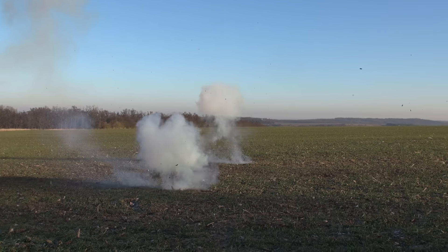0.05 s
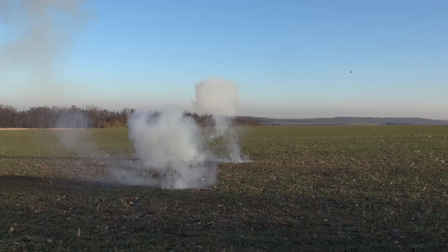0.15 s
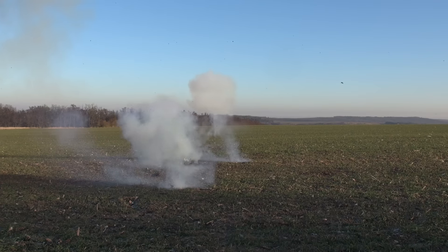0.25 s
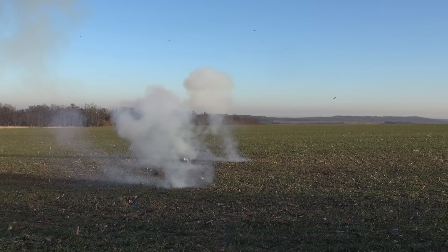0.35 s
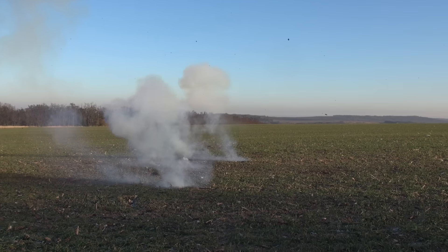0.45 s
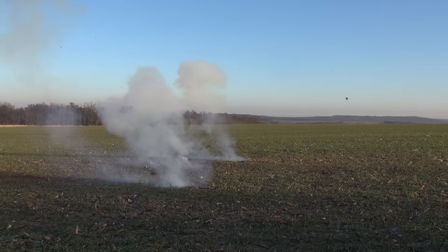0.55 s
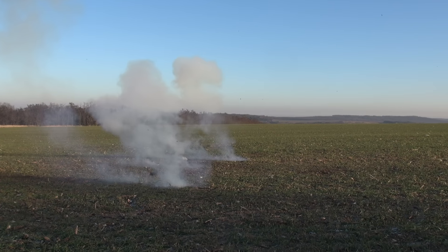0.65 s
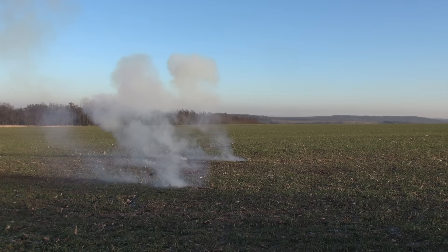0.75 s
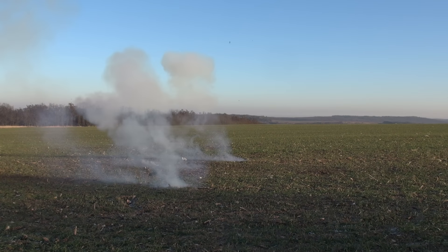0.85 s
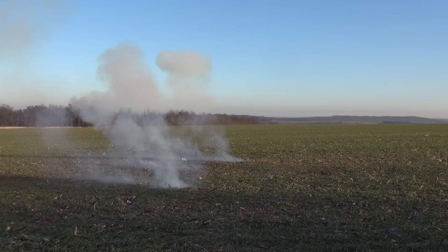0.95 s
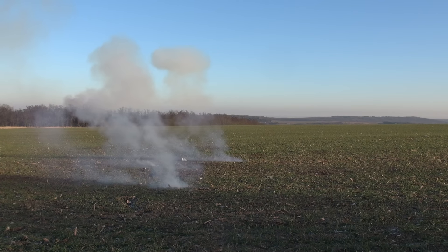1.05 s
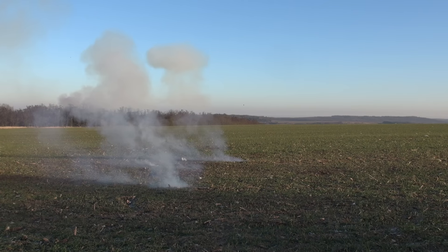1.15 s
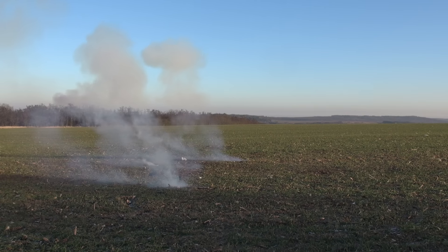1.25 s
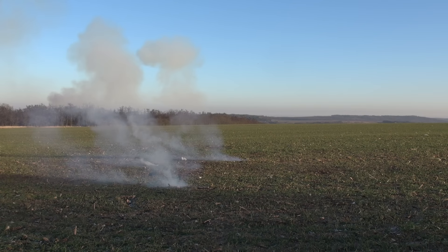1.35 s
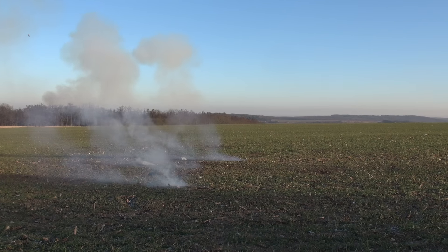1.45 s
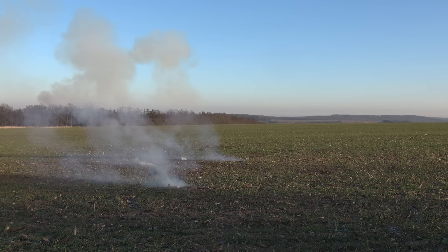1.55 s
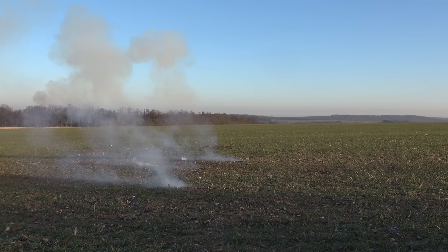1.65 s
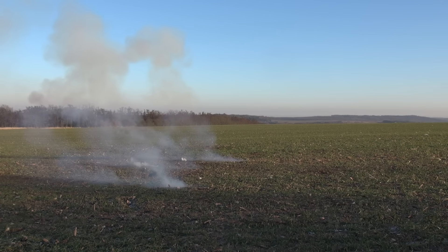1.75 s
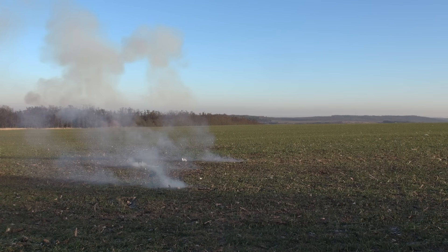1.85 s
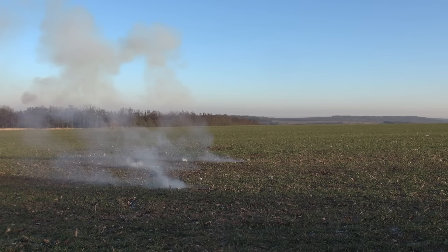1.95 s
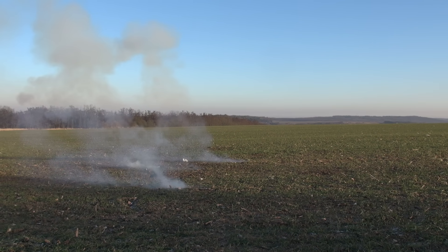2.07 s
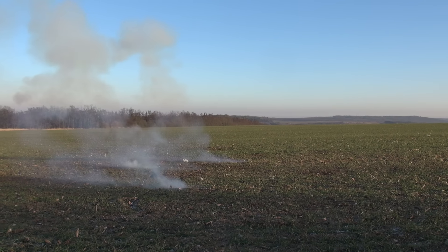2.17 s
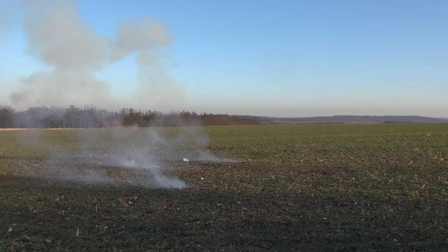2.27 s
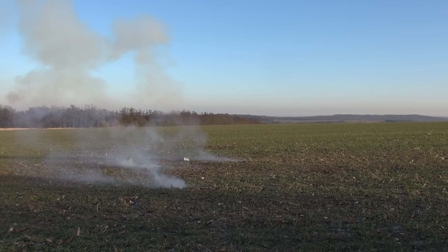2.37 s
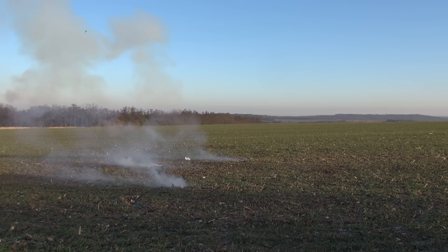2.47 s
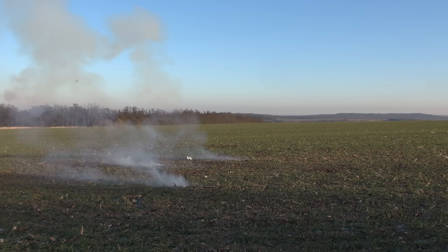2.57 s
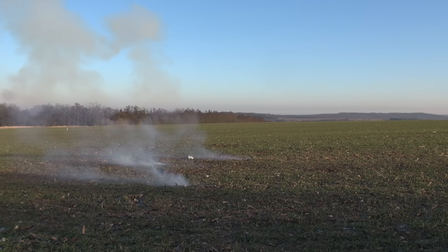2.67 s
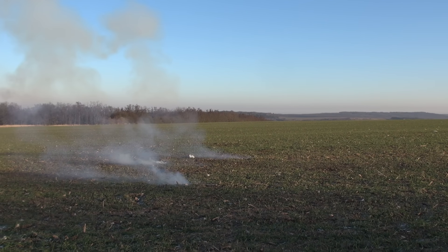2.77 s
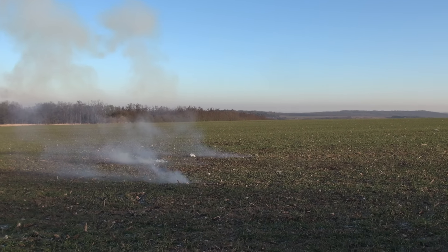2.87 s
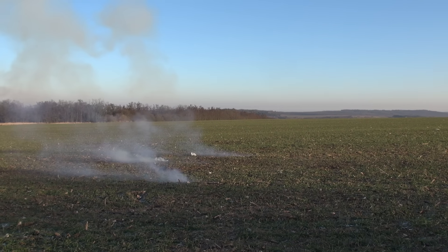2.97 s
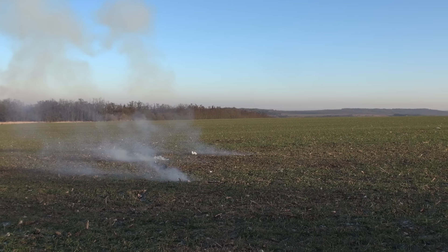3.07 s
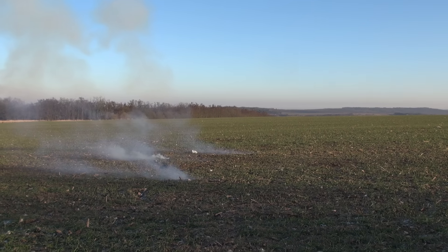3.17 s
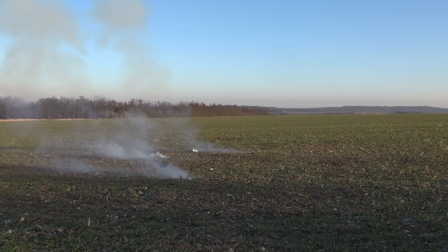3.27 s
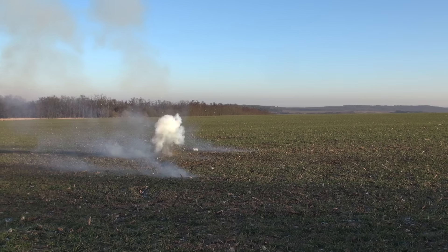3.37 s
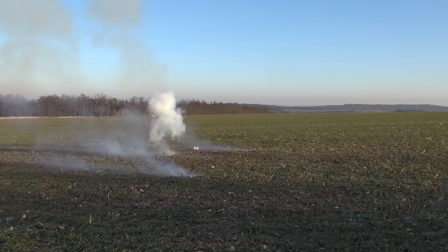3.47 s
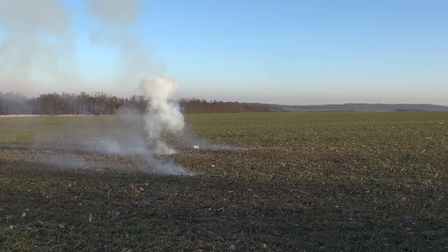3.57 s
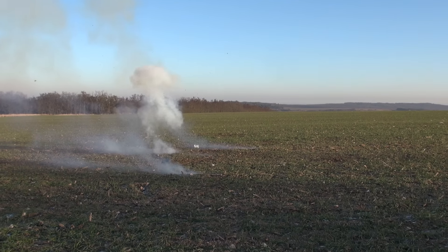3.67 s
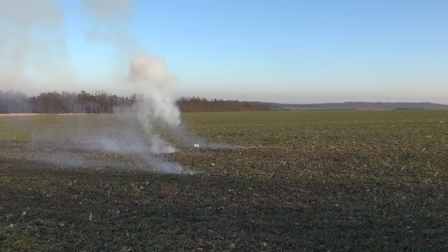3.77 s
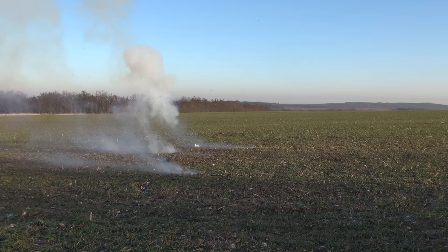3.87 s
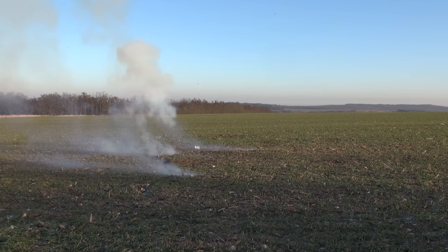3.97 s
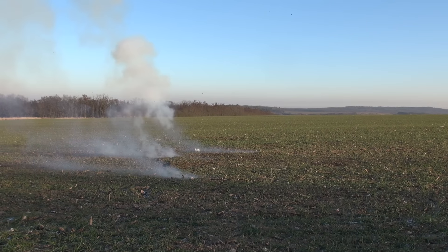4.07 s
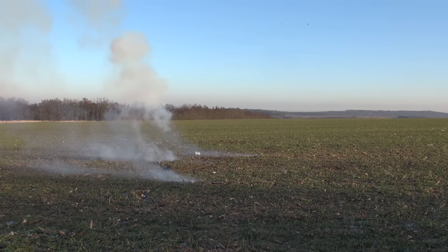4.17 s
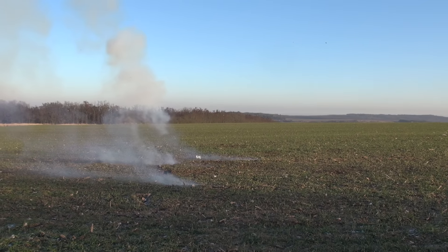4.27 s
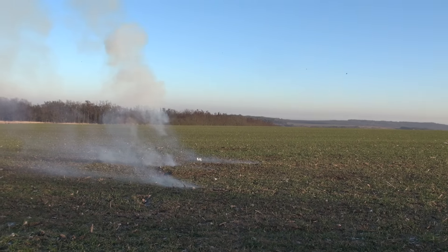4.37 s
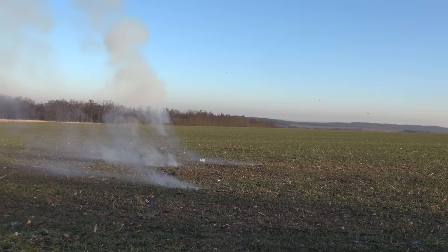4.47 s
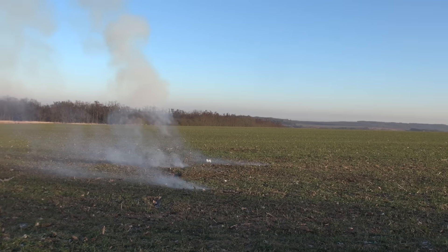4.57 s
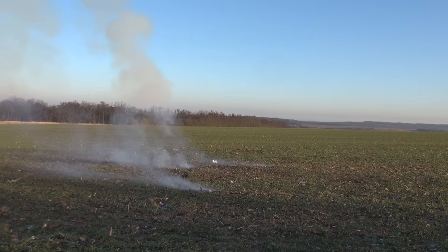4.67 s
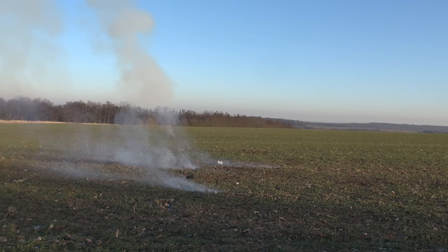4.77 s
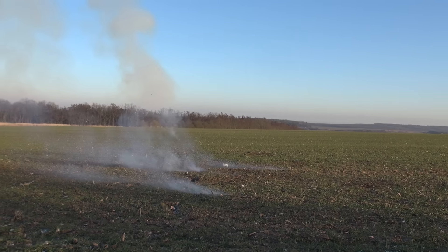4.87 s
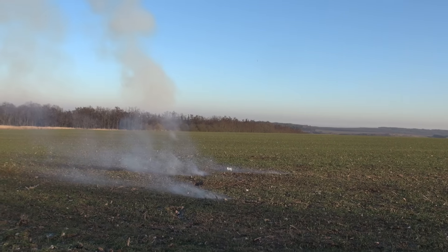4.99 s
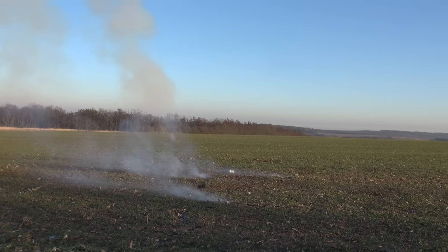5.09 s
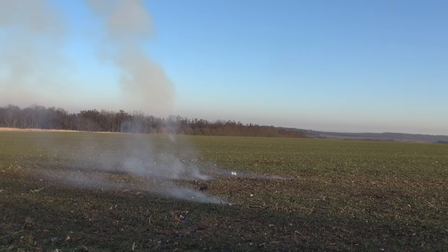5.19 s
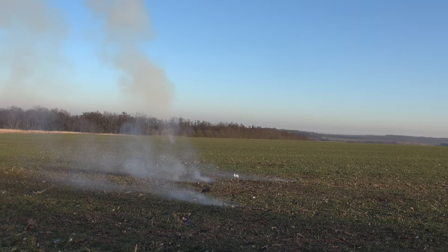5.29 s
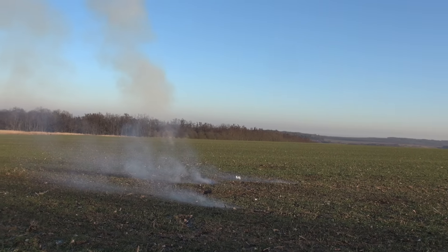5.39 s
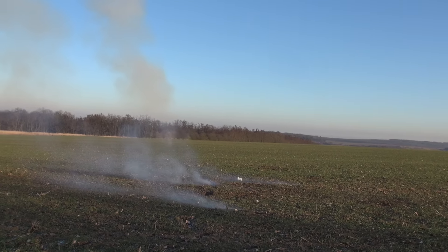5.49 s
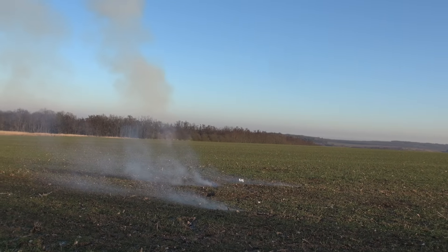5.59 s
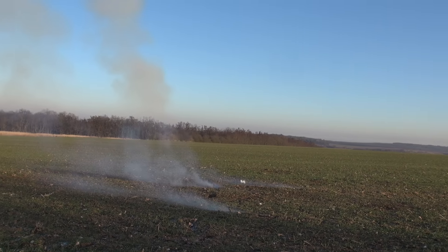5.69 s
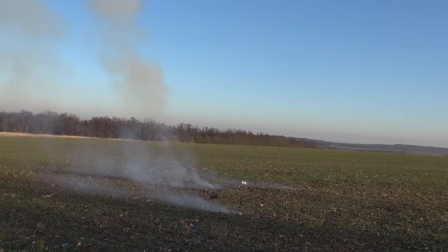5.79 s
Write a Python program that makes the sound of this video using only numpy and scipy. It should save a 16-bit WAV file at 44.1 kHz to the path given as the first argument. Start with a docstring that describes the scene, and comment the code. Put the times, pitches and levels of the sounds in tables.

```python
"""Big firecrackers on a bare field

Two have just exploded; a third bursts close by, its shock fronts overloading the microphone.
Each bang rolls out over the ground, then a forest edge throws it back as a long dying roar.
Clods of earth patter down nearby, something scuffs on the soil, and a thin, bright hiss swells late."""
import sys
import numpy as np
from scipy import signal
from scipy.io import wavfile
from scipy.ndimage import uniform_filter1d

SR = 44100
rng = np.random.default_rng(int(sys.argv[2]) if len(sys.argv) > 2 else 0)


def output_pcm(signal):
    """Save a mono or channel-first signal as 16-bit PCM at the path in sys.argv[1].

    Samples are clipped to [-1, 1] before scaling.
    """
    pcm = np.clip(np.atleast_2d(signal).T, -1, 1) * 32767
    wavfile.write(sys.argv[1], SR, np.round(pcm).astype(np.int16))


N = 257544
TIME = np.arange(N) / SR
EDGES_HZ = np.concatenate([np.geomspace(22, 5000, 20), np.geomspace(5800, 17000, 9)])
CENTRES_HZ = np.sqrt(EDGES_HZ[1:] * EDGES_HZ[:-1])

# the three explosions, the close one last: start_s, ground_roll_db, forest_echo_db, roar_db
BANGS = [(-.52, -32, -23.5, -27), (-.163, -16.5, -23.5, -15.5), (3.403, -13, -19.5, -15.5)]
# tone colour of earth landing: frequency_hz, level_db
CLOD_SPECTRUM = [(150, -8), (600, -9.5), (1200, -9), (1900, 0), (3200, 2), (4500, -8.5), (7500, 2.5),
                 (11000, -8), (14000, -2.5), (16000, -9)]
# stereo width of far sound, near sound and falling earth: frequency_hz, likeness (-1 to 1, 1 is mono)
FAR_LIKENESS = [(60, 0.66), (300, 0.79), (700, 0.66), (1400, 0.74), (3100, 0.56), (7000, -0.06),
                (15000, 0.2)]
NEAR_LIKENESS = [(60, 1), (300, 0.88), (1400, 0.83), (3100, 0.48), (5200, -0.35), (8500, -1), (15000, 0.12)]
CLOD_LIKENESS = [(300, 0.71), (2000, 0.72), (4000, -0.21), (8000, -0.82), (14000, -0.29)]
# panning of far and near sound: frequency_hz, left_over_right_db
FAR_BALANCE = [(60, 4), (110, -2.5), (200, 2), (350, 6), (700, 2.5), (1300, 4.5), (4400, 5.5),
               (15000, -2.5)]
NEAR_BALANCE = [(60, 0.088), (200, 0), (500, 0.93), (2000, 0.64), (15000, 0.26)]


def from_db(db):
    """Decibels to gain."""
    return 10 ** (np.asarray(db) / 20)


def rms_one(x):
    """Scale to unit rms."""
    return x / np.sqrt(np.mean(x ** 2) + 1e-20)


def panned(pan_db):
    """Left and right gains; positive leans left."""
    return from_db([[pan_db / 2], [-pan_db / 2]])


def at_hz(points, hz):
    """A table read on a log-frequency axis."""
    frequencies, values = np.transpose(points)
    return np.interp(np.log(hz), np.log(frequencies), values)


def since(start):
    """Seconds since start; zero before it."""
    return np.maximum(TIME - start, 0)


def dying(start, t60, rise, hold=0):
    """An envelope that rises, holds, then falls 60 dB in t60; all times in seconds."""
    age = TIME - start
    return np.clip(age / rise, 0, 1) * np.exp(-np.log(1000) * np.clip((age - hold) / t60, 0, 2))


def drift(per_s):
    """A random wander of unit rms that turns about per_s times a second."""
    knots = rng.standard_normal(8192)
    return rms_one(np.interp(TIME * per_s, np.arange(len(knots)), knots))


def low_pass(x, hz):
    """Second-order low-pass."""
    return signal.sosfilt(signal.butter(2, min(hz, .45 * SR), fs=SR, output="sos"), x + 1e-18)


def band_pass(x, edges_hz, order=2):
    """Butterworth band-pass."""
    return signal.sosfilt(signal.butter(order, edges_hz, "band", fs=SR, output="sos"), x)


def bands(spectrum, likeness, balance, white=None, order=2):
    """Yields (hz, stereo noise) band by band; together they have about unit power."""
    white = rng.standard_normal((2, 2, N)) if white is None else white
    gains = from_db(at_hz(spectrum, CENTRES_HZ))
    gains = gains / np.sqrt(np.sum(gains ** 2 * np.diff(EDGES_HZ)) * 2 / SR)
    for k, hz in enumerate(CENTRES_HZ):
        if spectrum[0][0] / 2 < hz < spectrum[-1][0] * 2:
            mid, side = gains[k] * band_pass(white[k % 2], EDGES_HZ[k:k + 2], order)
            alike = np.clip(at_hz(likeness, hz), -1, 1)
            mid, side = np.sqrt((1 + alike) / 2) * mid, np.sqrt((1 - alike) / 2) * side
            yield hz, np.array([mid + side, mid - side]) * panned(at_hz(balance, hz))


def noise(spectrum, likeness, balance, white=None):
    """Coloured stereo noise of about unit power."""
    return sum(band for hz, band in bands(spectrum, likeness, balance, white))


def grainy(per_s, spread_db):
    """White noise of flickering strength: a dense hail of tiny echoes or grains."""
    return rms_one(rng.standard_normal((2, 2, N)) * from_db(spread_db * drift(per_s)))


def tone(hz, db, waver_hz):
    """A sine of given rms level whose pitch wavers."""
    pitch_hz = hz + waver_hz * drift(250)
    return from_db(db) * np.sqrt(2) * np.sin(2 * np.pi * np.cumsum(pitch_hz) / SR)


def n_wave(start, hz):
    """A shock front lasting 1 / hz: pressure jumps up, sinks through zero and jumps back."""
    phase = (TIME - start) * hz
    return (1 - 2 * phase) * ((phase >= 0) & (phase < 1))


def background(air_db=-54, hiss_db=-57, dip_db=-6.5, deepest_s=0.54):
    """Faint open air and a trace of whine; a thin hiss and whistle dip after the last two bangs."""
    # tone colours of the air and the hiss: frequency_hz, level_db
    air_spectrum = [(30, 6), (200, 16.5), (600, 0.5), (1200, -30.5), (2500, -3.5), (4500, -18.5),
                    (8000, -42.5)]
    hiss_spectrum = [(2000, 10), (3800, 6), (5200, 4.5), (7400, 7.5), (9000, 3.5), (11500, -1.5),
                     (13000, 5.5), (16000, -16)]
    # the whistle sags just before the close blast: time_s, pitch_hz
    whistle_glide = [(0, 9960), (2.65, 10120), (3.35, 9830), (5.84, 10000)]
    # electrical whine: pitch_hz, level_db, waver_hz
    whine_tones = [(3820, -75.5, 35), (5670, -75, 55), (7200, -79.5, 40)]
    air = from_db(air_db) * noise(air_spectrum, FAR_LIKENESS, NEAR_BALANCE)
    whistle = tone(np.interp(TIME, *np.transpose(whistle_glide)), db=-74.5, waver_hz=90)
    whine = sum(tone(*row) for row in whine_tones)
    hiss = from_db(hiss_db) * noise(hiss_spectrum, FAR_LIKENESS, NEAR_BALANCE)
    ages = [since(start) / deepest_s for start, *_ in BANGS[1:]]
    dip = from_db(dip_db * sum((age * np.exp(1 - age)) ** 2 for age in ages))
    return air + whine + dip * (whistle + hiss)


def grit(per_s=7, level_db=-53, spread_db=3, t60_s=.008):
    """Faint crumbs of soil keep landing at random."""
    landings = rng.random(N) < per_s / SR
    strength = from_db(level_db + spread_db * np.clip(rng.standard_normal(N), -2, 2))
    envelope = signal.lfilter([1], [1, -from_db(-60 / (t60_s * SR))], landings * strength + 1e-18)
    return envelope * noise(CLOD_SPECTRUM, CLOD_LIKENESS, NEAR_BALANCE)


def hiss_swell(level_db=-58):
    """A thin, bright hiss with three broad peaks swells after the close blast, holds, then slowly fades."""
    # broad peaks of the hiss: centre_hz, width_hz, level_db
    peaks = [(7450, 1200, -3.5), (9900, 1500, -5.5), (12200, 2300, -5)]
    hiss = 0
    for hz, width, db in peaks:
        band = band_pass(rng.standard_normal((2, N)), [hz - width / 2, hz + width / 2])
        hiss = hiss + from_db(db) * rms_one(band)
    return from_db(level_db) * dying(start=4.42, t60=7.0, rise=0.25, hold=0.76) * hiss


def scuffs(thud_s=2.765, thud_db=-29, thud_width_s=0.01, thud_band_hz=(90, 400)):
    """Gritty slides over the soil; the firmest ends in a soft thud."""
    # tone colour of scraped soil: frequency_hz, level_db
    soil_spectrum = [(100, 2), (300, 3), (700, 4.5), (1100, 3.5), (2000, -3), (3500, -15), (6000, -23),
                     (16000, -42)]
    # slides and rustles: start_s, length_s, level_db
    slides = [(2.516, 0.12, -41.5), (2.643, 0.054, -41.5), (2.705, 0.028, -44.5), (2.754, .027, -36),
              (3.026, 0.11, -51), (3.134, .13, -49.5), (5.316, 0.27, -47.5), (5.7, .14, -49.5)]
    scrape = noise(soil_spectrum, NEAR_LIKENESS, NEAR_BALANCE, grainy(per_s=1000, spread_db=1))
    envelope = sum(from_db(db) * dying(start, t60=0.065, rise=0.014, hold=length)
                   for start, length, db in slides)
    earth = rms_one(band_pass(rng.standard_normal(N), thud_band_hz))
    thud = earth * np.exp(-.5 * ((TIME - thud_s) / thud_width_s) ** 2)
    return scrape * envelope + from_db(thud_db) * thud


def clods(tick_t60_s=0.0016, rise_s=0.00013, pivot_hz=4000, body_hz=800, decay_slope=0.3):
    """Each clod lands with a sharp tick and crumbles; the highs die first."""
    # earth landing, and one snap just ahead of the close blast:
    # start_s, level_db, brightness_db_per_octave, t60_s, tick_over_crumble_db
    landings = [(.149, -28.5, -4, 0.052, 15), (0.731, -33.5, -6, 0.023, 2), (.805, -23.5, -2.5, 0.047, 7.5),
                (.928, -44, 3, 0.013, -1), (1.076, -36, -3.5, 0.017, 7), (1.406, -39, -6, .03, 5),
                (1.921, -19, -2.5, 0.048, 8.5), (2.388, -46.5, -10.5, 0.052, -10),
                (2.503, -17, -2, 0.037, -3), (2.94, -45, -3, 0.018, 6), (3.262, -41, -8, 0.055, -10),
                (3.326, -52, -15, 0.014, -6), (3.3925, -14.5, -1, 0.025, 5), (3.552, -29.5, -6, 0.012, -2),
                (5.385, -46, 2, 0.018, 6), (5.463, -31.5, -2, 0.018, 5), (5.534, -36.5, -9.5, 0.02, 15)]
    out, age = np.zeros((2, N)), TIME[:SR // 8]
    tick = np.exp(-np.log(1000) * age / tick_t60_s)
    attack = np.minimum(age / rise_s, 1)
    for hz, band in bands(CLOD_SPECTRUM, CLOD_LIKENESS, NEAR_BALANCE):
        for start, db, brightness, t60, tick_db in landings:
            part = slice(round(start * SR), round(start * SR) + len(age))
            crumble = np.exp(-np.log(1000) * age / (t60 * (pivot_hz / hz) ** decay_slope))
            gain = from_db(db + brightness * np.log2(max(hz, body_hz) / pivot_hz))
            out[:, part] += gain * band[:, part] * attack * (from_db(tick_db) * tick + crumble)
    return out


def grove_swell(start):
    """Gain of a bang's echo as it sweeps through thicker and thinner forest."""
    # stretches of forest: delay_s, gain_db, half_width_s
    groves = [(0.449, 0, 0.028), (0.599, 0, 0.043), (.74, -0.5, 0.017), (.85, 1.5, 0.023), (1.241, 0, .09),
              (1.48, 1.5, 0.085)]
    return from_db(sum(db * np.exp(-.5 * ((TIME - start - delay) / width) ** 2)
                       for delay, db, width in groves))


def roar(levelling_s=.07, flutter_db=1.47, flutter_per_s=30):
    """The low mids of each bang carry furthest and rumble on round the landscape."""
    # tone colour of the rumble: frequency_hz, level_db
    boom_spectrum = [(25, -52), (60, -43), (110, -22), (170, -4), (240, 3), (320, 5.5), (420, -10),
                     (540, -14), (800, -35), (1500, -74.5)]
    power = sum((from_db(db) * grove_swell(start) * dying(start, t60=6.27, rise=0.18, hold=0.47)) ** 2
                for start, _, _, db in BANGS)
    boom = noise(boom_spectrum, FAR_LIKENESS, FAR_BALANCE)
    running_rms = np.sqrt(uniform_filter1d(boom.mean(0) ** 2, int(levelling_s * SR)) + 1e-9)
    flutter = from_db(flutter_db * drift(flutter_per_s))
    return np.sqrt(power) * flutter * boom / running_rms


def forest_echo(delay_s=0.306, hold_s=0.13, hold_edge_hz=4200, air_hz=10500, flutter_db=0.66):
    """Countless trunks throw each bang back as a crash; the air eats the treble of the longer paths."""
    # tone colour of the crash: frequency_hz, level_db
    crash_spectrum = [(30, -45.5), (60, -19.5), (110, 8.5), (200, 13.5), (450, -12), (650, 2), (1000, 2.5),
                      (1400, 1), (2000, -5), (3000, -11.5), (4500, -24.5), (7000, -33), (10000, -38),
                      (16000, -55)]
    # length of its tail: frequency_hz, t60_s
    tail_lengths = [(70, 3.5), (150, 1.9), (450, 5), (1000, 5.14), (2000, 4.39), (3000, 2.54), (4500, 2.5),
                    (8000, 1.3), (16000, 0.7)]
    out = np.zeros((2, N))
    echoes = [(start + delay_s, from_db(db) * grove_swell(start)) for start, _, db, _ in BANGS]
    trunks = grainy(per_s=800, spread_db=1.5)
    for hz, band in bands(crash_spectrum, FAR_LIKENESS, FAR_BALANCE, trunks, order=3):
        t60 = at_hz(tail_lengths, hz)
        hold = hold_s / (1 + (hz / hold_edge_hz) ** 2)   # only the front rows of trees return treble
        out += band * sum(gain * dying(arrival, t60, rise=0.033, hold=hold) for arrival, gain in echoes)
    return low_pass(out, air_hz) * from_db(flutter_db * drift(25))


def slap_echoes(front_hz=900, pan_db=-7.5):
    """Large reflectors send each shock back whole from the right, rounded by distance."""
    # banks and trees: delay_s, gain_over_ground_roll_db, cutoff_hz
    reflectors = [(.1125, 9, 1100), (.2555, -8, 1100), (.302, 1, 1200), (0.3308, 11, 2700),
                  (0.3837, 8, 2000), (.453, 4.5, 2800), (0.513, 1, 2000), (.705, -2, 2200), (.819, 3, 2400)]
    out = np.zeros(N)
    for delay, db, cutoff_hz in reflectors:
        fronts = sum(from_db(roll_db + db) * n_wave(start + delay, front_hz)
                     for start, roll_db, _, _ in BANGS)
        out += low_pass(low_pass(fronts, cutoff_hz), cutoff_hz)
    return panned(pan_db) * out


def ground_roll(from_hz=3130, to_hz=680, sink_s=.065, steepness=14.0, edge_lift=0.12, leak_db=-21):
    """The field scatters the last two bangs back from ever further away: noise whose top edge sinks."""
    # tone colour of the roll: frequency_hz, level_db
    roll_spectrum = [(150, -31), (300, 2), (450, 7.5), (660, 1.5), (900, -6.5), (1400, -9), (2500, -15),
                     (5000, -28.5)]
    rolls = []
    for start, db, _, _ in BANGS[1:]:
        edge_hz = to_hz + (from_hz - to_hz) * np.exp(-since(start) / sink_s)
        rolls.append((from_db(db) * dying(start, t60=2.13, rise=0.016), edge_hz))
    out = np.zeros((2, N))
    scatter = grainy(per_s=1000, spread_db=0.5)
    for hz, band in bands(roll_spectrum, NEAR_LIKENESS, NEAR_BALANCE, scatter, order=3):
        for envelope, edge_hz in rolls:
            past_edge = (hz / edge_hz) ** steepness
            lift = 1 + edge_lift * 2 * past_edge / (1 + past_edge ** 2)   # strongest right at the edge
            passed = np.maximum(lift / np.hypot(1, past_edge), from_db(leak_db))
            out += band * envelope * passed
    return out


def close_blast(burst_db=-5, front_cutoff_hz=8000):
    """N-shaped shock fronts crack, with a short burst scattered by the rough soil."""
    # shock fronts, direct and off the ground: start_s, level_db, pitch_hz (1 / length)
    shocks = [(3.4052, -2.5, 820), (3.4077, -1.5, 349), (3.4117, 7, 1157), (3.4154, -17, 646)]
    # tone colour of the burst: frequency_hz, level_db
    burst_spectrum = [(25, -17), (70, 2), (300, 7), (1000, 0), (1500, -13), (2500, -19), (4000, -27.5),
                      (8000, -34), (16000, -48)]
    fronts = sum(from_db(db) * n_wave(start, hz) for start, db, hz in shocks)
    envelope = dying(BANGS[-1][0], t60=0.13, rise=0.0053, hold=0.014)
    burst = noise(burst_spectrum, NEAR_LIKENESS, NEAR_BALANCE) * envelope
    return low_pass(fronts, front_cutoff_hz) + from_db(burst_db) * burst


def scene(right_lag_s=.00003):
    """The bangs and the forest lie a little to the left, so they reach the right side later."""
    left, right = close_blast() + ground_roll() + slap_echoes() + forest_echo() + roar()
    bangs = np.array([left, np.interp(TIME - right_lag_s, TIME, right)])
    return bangs + clods() + scuffs() + hiss_swell() + background() + grit()


def record(dry, cutoff_hz=16300):
    """The loudest peaks overload the microphone and flatten; the very top is cut."""
    clipped = dry / (1 + dry ** 6) ** (1 / 6)
    return signal.sosfilt(signal.ellip(10, .1, 80, cutoff_hz, fs=SR, output="sos"), clipped)


dry = scene()
out = record(dry)
output_pcm(out)
```